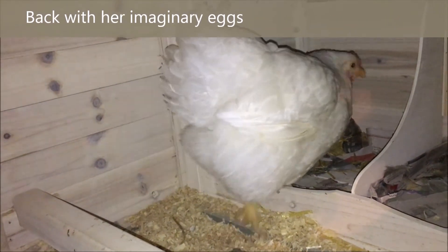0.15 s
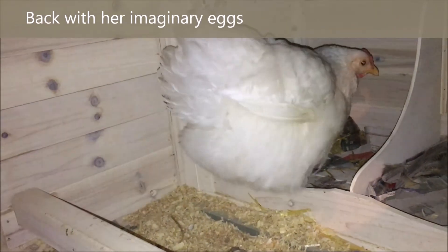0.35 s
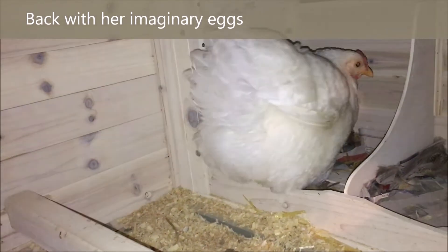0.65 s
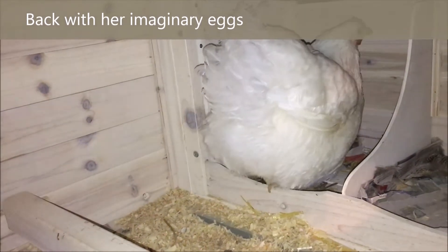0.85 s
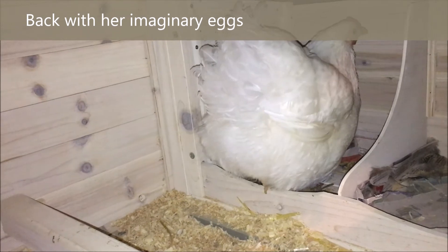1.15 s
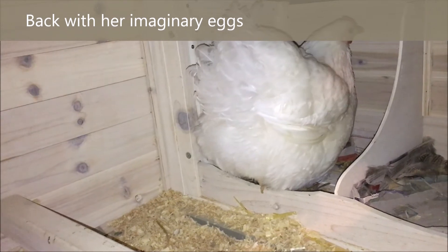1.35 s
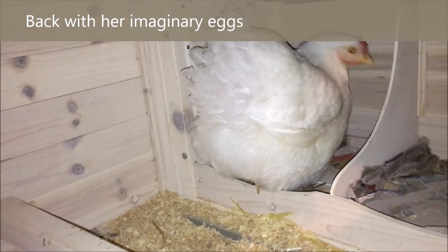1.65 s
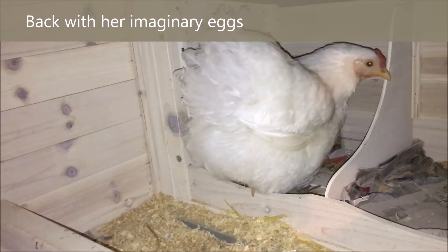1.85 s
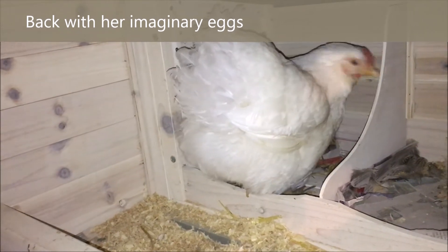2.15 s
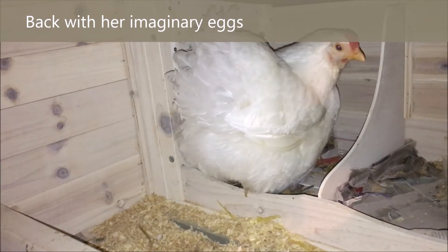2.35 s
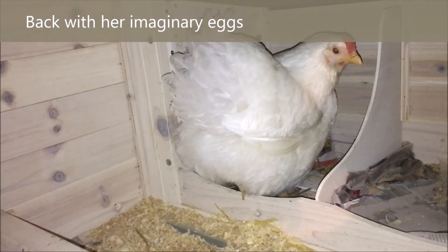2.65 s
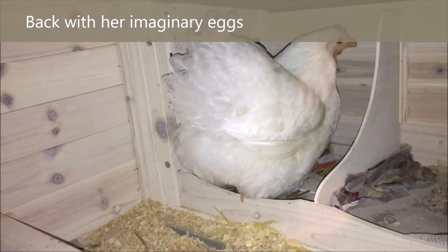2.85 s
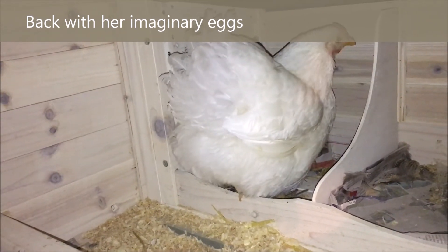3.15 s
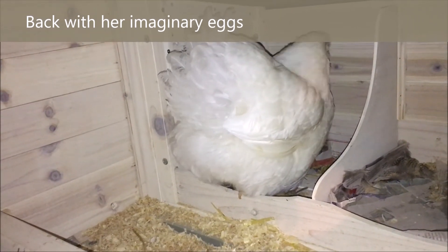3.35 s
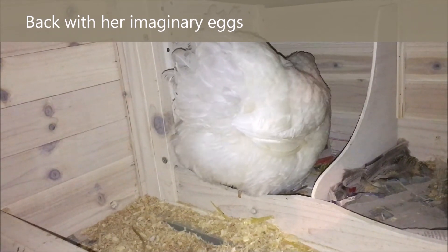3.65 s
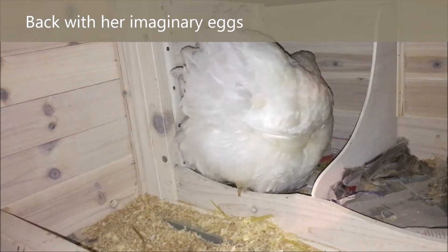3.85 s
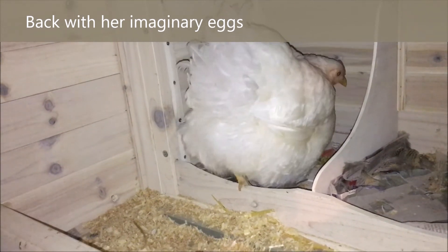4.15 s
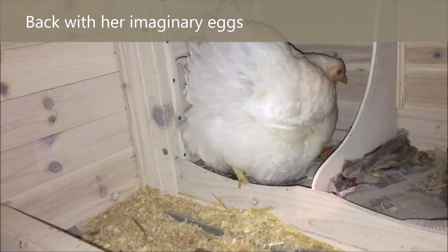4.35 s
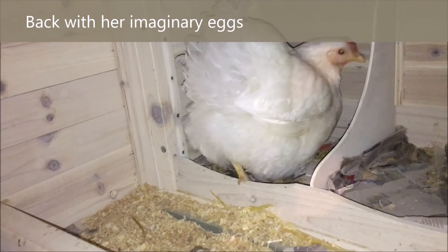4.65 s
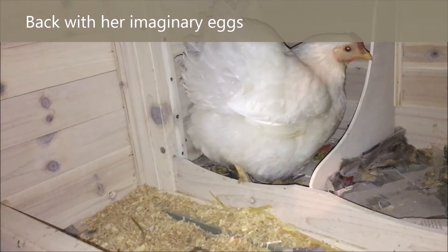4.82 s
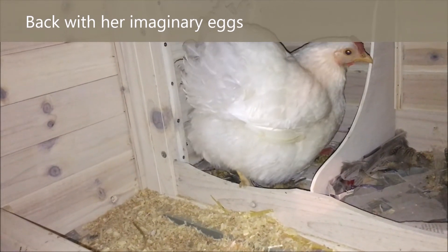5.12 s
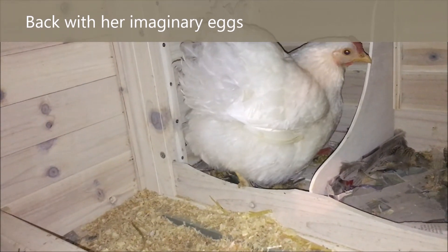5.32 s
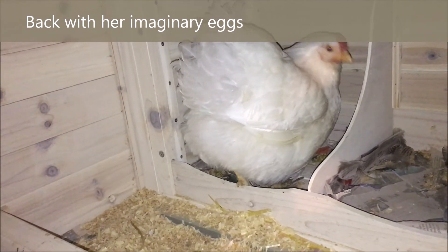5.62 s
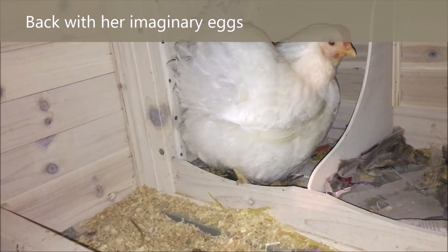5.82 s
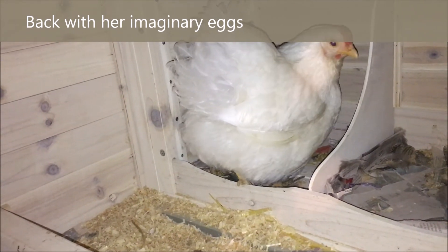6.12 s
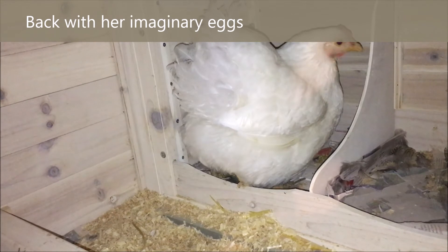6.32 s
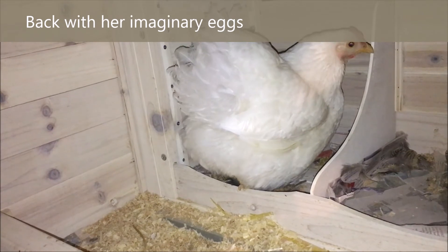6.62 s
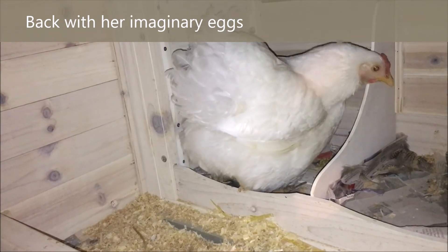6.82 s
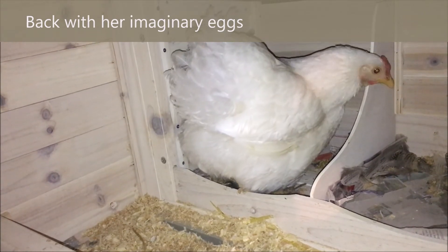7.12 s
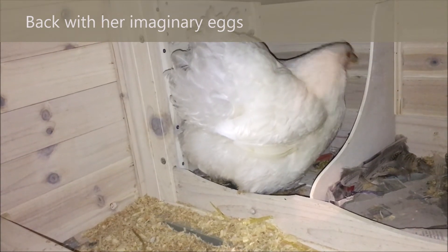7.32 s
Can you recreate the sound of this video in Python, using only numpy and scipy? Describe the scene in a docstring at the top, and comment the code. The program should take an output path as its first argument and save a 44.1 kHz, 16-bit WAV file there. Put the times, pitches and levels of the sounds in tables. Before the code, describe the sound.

Inside a small boarded hen house, a hen a few metres from the microphone cackles: short, low, throaty clucks about four a second, broken by four loud squawks nearly two seconds apart. A second hen very close murmurs briefly and softly. Early on, feet boom on floorboards and shavings crackle. Quiet rumble and hiss lie beneath, with a low hum rising near the end.

```python
"""A boarded hen house: a hen a few metres away cackles, short clucks broken by four loud squawks.
Her voice is a stack of partials and air noise, shaped by throat resonances and ringing in the room.
A second hen close by murmurs softly in the same way; feet boom on the boards (fading sine waves)
and shavings crackle (bursts of grainy noise).
Low outdoor rumble, a narrow hum that grows late and microphone hiss (filtered noise) lie underneath."""
import sys
import numpy as np
from scipy import signal
from scipy.fft import rfft, irfft, next_fast_len
from scipy.io import wavfile
from scipy.ndimage import map_coordinates

SR = 44100
rng = np.random.default_rng(int(sys.argv[2]) if len(sys.argv) > 2 else 0)


def to_wav(sig):
    """Store sig (one row per channel, or 1-D mono) as 16-bit WAV at the path in sys.argv[1].

    Samples outside -1..1 are clipped; the rate is SR.
    """
    pcm = np.clip(np.atleast_2d(sig), -1, 1) * 32767
    pcm = np.round(pcm).astype(np.int16)
    wavfile.write(sys.argv[1], SR, pcm.T)  # frames by channels


def ratio_of_db(decibels):
    """Turn decibels (scalar or array-like) into linear amplitude factors; 0 dB maps to 1."""
    return 10 ** (np.asarray(decibels, float) / 20)


N = 329854  # length of the scene in samples

# pitch curve of each squawk, a slide up, a sag to the held note, a lift near the end:
# (time [s], pitch [Hz])
PITCH_CURVES = [
    [(1.612, 717), (1.645, 866.7), (1.665, 861), (1.68, 790.6), (1.75, 801), (1.79, 830.6), (1.815, 891),
     (1.84, 913)],
    [(3.566, 736), (3.596, 965), (3.64, 891), (3.7, 858.5), (3.74, 865.5), (3.785, 911), (3.81, 934)],
    [(5.248, 742), (5.275, 916), (5.31, 920), (5.335, 863.6), (5.365, 834), (5.41, 861.3), (5.44, 907),
     (5.48, 875)],
    [(6.845, 710), (6.858, 778), (6.875, 781.4), (6.892, 641.3), (6.93, 617), (7.015, 619), (7.05, 639.7),
     (7.08, 610)],
]


def unit(x):
    """Scale to rms 1."""
    return x / np.sqrt(np.mean(x ** 2) + 1e-20)


def along(points, hz):
    """Read a curve of (frequency [Hz], value) points at any frequency, on a log axis."""
    f, value = np.transpose(points)
    return np.interp(np.log(hz + 1), np.log(f + 1), value)


def wobble(n, rate):
    """A smooth random curve of n samples, with rate random knots a second."""
    knots = rng.standard_normal(int(n * rate / SR) + 4)
    return map_coordinates(knots, [np.arange(n) * rate / SR])


def filtered(x, response):
    """Multiply the spectrum of x by a response of frequency."""
    m = next_fast_len(len(x) + 4096)
    spectrum = rfft(x, m) * response(np.fft.rfftfreq(m, 1 / SR))
    return irfft(spectrum, m)[:len(x)]


def add(track, s, x):
    """Mix x into the track from time s (seconds) on."""
    start = max(round(s * SR), 0)
    track[start:start + len(x)] += x[:len(track) - start]


def syrinx(beat_hz, odd, rough, jitter):
    """A bird's voice box: pulses as a stack of partials; rough ones waver and leak air once a beat."""
    n = len(beat_hz)
    rough = np.clip(rough, 0, 1)
    wavering_hz = beat_hz * (1 + jitter * rough * wobble(n, 118.33))
    phase = 2 * np.pi * np.cumsum(wavering_hz) / SR
    k = np.arange(1, int(17000 / np.median(beat_hz)))[:, None]  # partial numbers
    spread = 0.08 * k ** 2  # the high partials of a pulse arrive spread in time
    level = np.where(k % 2, odd, 1)
    pulses = unit(np.sum(level * np.cos(k * phase + spread), axis=0))
    air = unit(rng.standard_normal(n) * (0.95 + np.cos(phase)))
    uneven_size = ratio_of_db(8 * rough * wobble(n, 90))
    return (pulses + 1.3 * rough * air) * uneven_size


def house(x, direct_db):
    """Direct sound and a fading noise tail, drawn anew at each use."""
    # how long the room rings: (frequency [Hz], time to fall by 60 dB [s])
    ring_times = [(250, 0.26), (1000, .42), (3500, 0.33), (7000, 0.29), (14000, 0.24)]
    # a bunch of late, dull echoes from the far wall: (delay [s], spread [s], level [dB])
    delay, spread, wall_db = (.078, .012, -4)
    hz, t, z = signal.stft(rng.standard_normal(int(0.6 * SR)), SR, nperseg=256)
    dullness = 1 + (hz[:, None] / 2500) ** 2
    echoes = ratio_of_db(wall_db) * np.exp(-((t - delay) / spread) ** 2) / dullness
    build = 1 - np.exp(-t / 0.0013) + echoes
    decay = ratio_of_db(-60 * t / along(ring_times, hz)[:, None])
    tail = signal.istft(z * build * decay, SR, nperseg=256)[1]
    tail /= np.linalg.norm(tail)
    tail[0] += ratio_of_db(direct_db)  # direct sound against the whole tail
    return signal.fftconvolve(x, tail)


def background():
    """Random noise filtered into microphone hiss, a wavering far rumble and a narrow hum."""
    # tone of the air noise, relative: (frequency [Hz], level per Hz [dB])
    air_tone = [(20, -43.5), (35, -3.5), (60, 2.5), (129, -5), (160, -16.5), (400, -23.5), (785, -31),
                (2400, -34), (3950, -36.5), (8000, -38.5), (10700, -42), (15600, -48)]
    t = np.arange(N) / SR

    def noise(response):
        return unit(filtered(rng.standard_normal(N), response))

    hiss_db = -74.5 + 0.85 * wobble(N, 5.5)
    hiss = ratio_of_db(hiss_db) * noise(lambda hz: ratio_of_db(along(air_tone, hz)) * (hz > 150))
    rumble_db = -71 + 1.2 * wobble(N, 2.4)
    rumble = ratio_of_db(rumble_db) * noise(lambda hz: ratio_of_db(along(air_tone, hz)) * (hz < 160))
    # the hum grows by 12 dB a second from 5.6 s on, then stays up
    hum_db = np.clip(-81.5 + 12 * (t - 5.6), -81.5, -67)
    hum = ratio_of_db(hum_db) * noise(lambda hz: np.exp(-((hz - 126) / 9) ** 2))
    return hiss + rumble + hum


def thuds():
    """A landing foot sets the floor boards booming: fading sine waves whose phase wanders."""
    # feet on the boards: (time [s], level [dB])
    steps = [(.614, -42.5), (.635, -42), (.659, -45), (.8, -49.5), (0.981, -51), (1.221, -55), (2.05, -59),
             (2.3, -68), (4.77, -58), (4.902, -58), (7.219, -61)]
    # tones of the boards: (frequency [Hz], level [dB], time to fall by 60 dB [s])
    board_tones = [(66, -1.5, 1), (82, -18.5, 0.59), (116.5, -1, 0.92), (158, -8, 0.91),
                   (210.6, -10.5, 1.2), (271.4, -3, 0.54), (335, -7.5, 0.93), (435, -8, 0.57)]
    out, t = np.zeros(N), np.arange(SR) / SR
    loudest_db = max(db for _, db in steps)
    for s, db in steps:
        dull_db = 0.25 * (loudest_db - db)  # softer steps lose more treble, in dB per octave
        ring = np.zeros(SR)
        for hz, level, t60 in board_tones:
            tone_db = level - dull_db * np.log2(hz / 65) + rng.normal(0, 0.67)
            tone = np.sin(2 * np.pi * hz * t + 2.5 * wobble(SR, 18))
            ring += ratio_of_db(tone_db - 60 * t / t60) * tone
        add(out, s, ratio_of_db(db) * ring * (1 - np.exp(-t / 0.0013)))
    return out


def shuffles():
    """Shavings crackle in short bursts of noise, grainy because its level jumps about quickly."""
    # bursts: (time [s], level [dB], time to fall by 60 dB [s], centre frequency [Hz])
    bursts = [(0.122, -62, 0.037, 5000), (.2, -51, 0.03, 2480), (.274, -45, .034, 6800),
              (.62, -57.5, 0.83, 1110), (0.631, -44.5, 0.12, 1950), (.659, -52.5, .11, 5830),
              (0.701, -61, 0.17, 2970), (.762, -61, 0.092, 4500), (.784, -64, 0.074, 5000),
              (0.824, -62, .05, 8900), (.924, -53.5, 0.032, 3400), (2.445, -66.5, .04, 7060),
              (2.848, -64, 0.28, 2530), (4.419, -61, 0.039, 3030), (4.77, -51, .2, 1800),
              (4.823, -56, .1, 2500)]
    out, t = np.zeros(N), np.arange(SR // 2) / SR
    for s, db, t60, centre_hz in bursts:
        grains = rng.standard_normal(len(t)) * ratio_of_db(2.6 * wobble(len(t), 460))
        crackle = unit(filtered(grains, lambda hz: ratio_of_db(-5.5 * np.log2((hz + 50) / centre_hz) ** 2)))
        envelope = ratio_of_db(db - 60 * t / t60) * (1 - np.exp(-t / 0.003))
        add(out, s - 0.003, envelope * crackle)  # starts 3 ms ahead of the listed time
    return out + ratio_of_db(-9) * house(out, direct_db=-12)[:N]


def murmurs():
    """The near hen's soft pulses through a closed beak, nearly without room."""
    # murmurs: (time [s], peak level [dB], pitch [Hz], length [s], throat resonance [Hz])
    calls = [(0.185, -42, 310, 0.011, 322), (0.194, -36.5, 312, 0.045, 583),
             (0.563, -36.5, 322, 0.088, 310), (2.799, -33.5, 287.8, 0.063, 573),
             (3.396, -43.5, 301, .022, 600), (3.413, -37, 289, 0.034, 575), (3.885, -53, 308, 0.017, 290),
             (4.396, -39.5, 328, 0.027, 325), (4.419, -36.5, 309, .028, 343), (4.443, -48, 290, 0.023, 320),
             (5.874, -52, 295, 0.016, 580), (5.878, -46, 292, 0.035, 580), (6.785, -38, 290.4, 0.072, 560)]
    out = np.zeros(N)

    def peak(f, centre, width):
        return 1j * f * width / (centre * centre - f * f + 1j * f * width)

    for s, db, pitch_hz, length, throat_hz in calls:
        u = np.linspace(0, 1, int(length * SR))
        beat = pitch_hz * (1 - 0.4 * (u - 0.7) ** 2)  # rises, levels off and dips slightly
        swell = np.sin(np.pi * u ** 0.63) ** 1.9
        voice = np.pad(swell * syrinx(beat, 1, 0.49, jitter=0.23), (0, 900))
        effort = ratio_of_db(0.68 * (db + 28))  # louder murmurs wake the upper resonances

        def throat(f):
            upper = peak(f, 880, 400) - 0.17 * peak(f, 1800, 300)
            closed_beak = (1 + 1j * f / 2000) ** 2 * (1 + (f / 2500) ** 4)  # dulls the treble
            return (peak(f, throat_hz, 220) - effort * upper) / closed_beak

        voice = filtered(voice, throat)
        add(out, s - 0.006, ratio_of_db(db) * voice / np.abs(voice).max())
    return out + ratio_of_db(-24) * house(out, direct_db=-12)[:N]


def clucks():
    """The far hen's clucks: each slides up into its pitch, swells, brightens with effort and sags."""
    # clucks, alone or closing a squawk:
    # (time [s], level [dB], pitch [Hz], roughness [0-1], second resonance [Hz])
    calls = [(.008, -43, 396.3, 0.16, 4220), (.271, -40.5, 400.5, 0.27, 4100),
             (.524, -38, 412.5, 0.32, 3900), (0.997, -45, 432.8, 0.27, 3340),
             (1.252, -42.5, 390.3, 0.41, 3280), (1.508, -41, 384.8, 0.36, 3300),
             (1.815, -46.5, 394.3, 0.24, 3660), (2.014, -38.5, 381.3, .3, 3390),
             (2.284, -40.5, 408, 0.19, 3070), (2.577, -45, 359, 0.4, 3410), (3.439, -46, 385, 0.37, 3920),
             (3.779, -44, 404.2, .35, 3460), (3.975, -38.5, 379.5, 0.34, 3340),
             (4.237, -42.5, 393.1, .22, 3320), (4.534, -41, 397.5, 0.36, 3090),
             (4.884, -42, 394, .37, 3140), (5.133, -41, 387.7, 0.19, 3220), (5.442, -43.5, 411.4, .2, 3500),
             (5.647, -38, 404.5, 0.4, 3410), (6.735, -45.5, 368.3, 0.26, 3160),
             (7.055, -48.5, 400.5, 0.42, 3470), (7.231, -39, 415.7, 0.42, 3330),
             (7.466, -48, 371, 0.27, 3330)]
    # throat of a cluck: (frequency [Hz], level [dB])
    closed_beak = [(130, -68.5), (290, -9), (420, -33.5), (560, -8.5), (720, -19.5), (900, -12.5),
                   (1180, -2), (1560, -19.5), (2000, -28.5), (2500, -29.5), (5000, -41), (9000, -45.5),
                   (15000, -55.5)]
    out, u = np.zeros(N), np.linspace(0, 1, round(0.04265 * SR))

    def bump(hz, centre_hz, width_hz):
        return np.exp(-((hz - centre_hz) / width_hz) ** 2)

    for s, db, pitch_hz, rough, second_hz in calls:
        # the beak is still ajar for about 0.18 s after a squawk
        waits = [max(s - rows[-1][0], 0) for rows in PITCH_CURVES if rows[0][0] < s]
        ajar = np.exp(-(min(waits, default=np.inf) / 0.18) ** 2)
        # calm level, 7.5 dB more per octave of the second resonance, 12.5 dB more with the beak ajar
        upper_db = -1.5 + 7.5 * np.log2(second_hz / 3300) + 12.5 * ajar
        slide = 0.1162 + 0.4746 * rough  # rougher clucks start further below their pitch
        beat = pitch_hz * (1 - slide * np.exp(-u / 0.2262) - 0.31 * slide * u ** 4)
        swell = np.sin(np.pi * u ** 1.234)
        pulses = syrinx(beat, 1.0, rough, jitter=0.262)

        def low_throat(hz):
            flatter = 1 - 0.25 * rough * (hz > 700)  # roughness flattens the throat's curve
            thinner_db = -8 * ajar * (hz < 450)  # an open beak weakens the lowest partial
            return ratio_of_db(along(closed_beak, hz) * flatter + thinner_db) * (hz < 2200)

        def high_throat(hz):
            resonances_db = 14 * bump(hz, second_hz, 520) + 11 * bump(hz, 1.62 * second_hz, 700)
            return ratio_of_db(along(closed_beak, hz) + (upper_db + resonances_db)) * (hz >= 2200)

        low = filtered(np.pad(swell * pulses, 400), low_throat)
        high = filtered(np.pad(swell ** 1.11 * pulses, 400), high_throat)
        voice = (low + high) / np.std(low)
        add(out, s - 0.016, ratio_of_db(db) * house(voice, direct_db=-8))
    return out


def squawks():
    """Long open-beak calls; period doubling (every other pulse differs) adds partials halfway between."""
    # squawks: (end of the muffled start [s], end of the unsettled opening [s], level [dB]),
    # both times counted from the start of the squawk
    calls = [(0.021, 0.061, -35), (0.016, .085, -35), (0.02, .082, -36), (.009, .05, -34)]
    # held note of each squawk: (period doubling [0-1], roughness [0-1])
    held_notes = [(.85, .03), (.03, .07), (.05, .085), (.9, .08)]
    # open-beak throat, as the head is held in each squawk: (frequency [Hz], level [dB])
    throats = ([(210, -58), (350, -32.5), (660, -46), (774, -20.5), (892, -9.5), (1210, -4), (1460, -7.5),
                (2800, -20.5), (3220, -5.5), (3960, -23), (6580, -20.5), (7960, -30), (15500, -47.5)], [(290, -70), (500, -31), (863, -8), (1350, -5.5), (1880, -4.5),
                                  (2230, -7.5), (3060, -17), (3530, -2), (5280, -21.5), (7030, -10.5),
                                  (7670, -26), (9650, -24), (15500, -41.5)], [(290, -65.5), (500, -26), (666, -1), (827, -8),
                                                    (1430, -2), (1750, -4), (2230, -13), (2500, -7.5),
                                                    (2890, -18), (3430, -0.5), (4770, -19.5), (7030, -14),
                                                    (15500, -42.5)], [(160, -60), (280, -26.5),
                                                                      (586, -19.5), (742, -12), (954, -2),
                                                                      (2210, -6), (2490, -21.5),
                                                                      (2990, -5.5), (3850, -3.5),
                                                                      (4400, -26), (5030, -7.5),
                                                                      (5660, -28), (6580, -15),
                                                                      (15500, -50)])
    closing_s, settle_s, fade_s = 0.035, 0.022, 0.031
    out = np.zeros(N)
    for (muffled, opening, db), held, rows, throat in zip(calls, held_notes, PITCH_CURVES, throats):
        s, pitch = np.transpose(rows)
        length = s[-1] - s[0]
        t = np.arange(0, length, 1 / SR)
        # opens in the opposite manner to the held note (plain or doubled), breaks roughly into it
        # and ends hoarse; each manner is (period doubling, roughness)
        start = (1 - held[0]) * np.array([0.6, 0.3]) + [0, 0.09]
        manners = [start, (0.3, 0.22), held, held, (0.15 + 0.3 * held[0], 0.22)]
        stages = [opening - 2 * settle_s, opening - settle_s, opening,
                  length - closing_s - settle_s, length - closing_s]
        doubling, rough = (np.interp(t, stages, manner) for manner in np.transpose(manners))
        # beats at half the pitch: the odd partials are the doubling
        half_pitch = np.interp(t, s - s[0], pitch) / 2
        beats = syrinx(half_pitch, doubling, rough, jitter=0.12)
        voice = unit(filtered(beats, lambda hz: ratio_of_db(along(throat, hz))))
        treble = filtered(voice, lambda hz: hz ** 2 / (hz ** 2 + 3000 ** 2))
        voice -= treble * np.exp(-(t / 0.03) ** 2)  # the beak opens during the first moments
        edges = np.clip(np.minimum(t, length - t) / 0.0063, 0, 1)
        # muffled start, burst, held note, fade, with a steady sag of 10.5 dB a second
        effort_times = [muffled, muffled + 0.012, opening, length - fade_s, length]
        effort_db = -10.5 * t + np.interp(t, effort_times, [-8, 4, 0, 0, -13])
        add(out, s[0], house(voice * edges * ratio_of_db(db + effort_db), direct_db=0))
    return out


def scene():
    """Both hens, the floor and the background, as one channel."""
    return (background() + thuds() + shuffles() + murmurs() + clucks() + squawks())[None]


def top_cut(x):
    """Nothing passes above the cut-off."""
    return signal.sosfilt(signal.butter(12, 15760, fs=SR, output="sos"), x)


def record(dry):
    """The microphone cuts the deepest bass and colours the treble unevenly."""
    # microphone response: (frequency [Hz], level [dB])
    microphone = [(20, -19.5), (45, 0.5), (8000, 0.5), (9700, 3), (10700, -2.5), (12500, 5.5), (15500, 0.5)]
    heard = filtered(dry[0], lambda hz: ratio_of_db(along(microphone, hz)))[None]
    return top_cut(heard)


dry = scene()
out = record(dry)
to_wav(out)
```